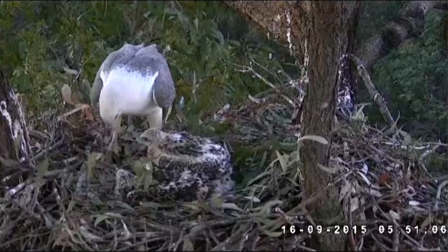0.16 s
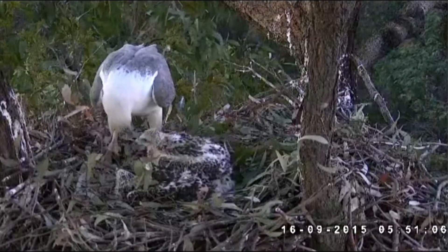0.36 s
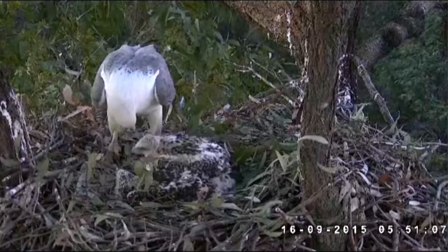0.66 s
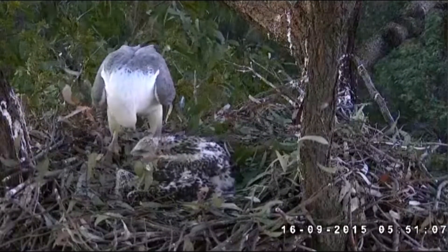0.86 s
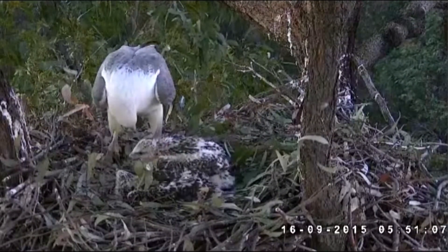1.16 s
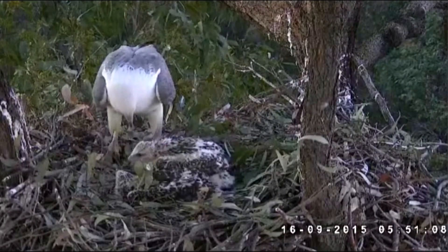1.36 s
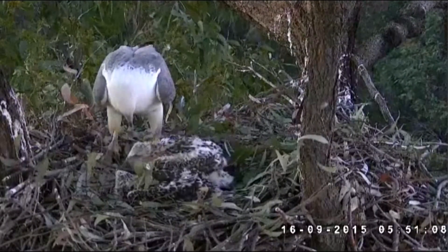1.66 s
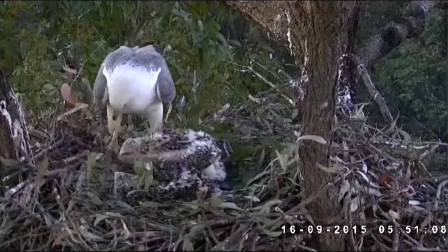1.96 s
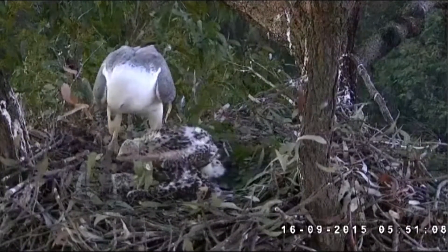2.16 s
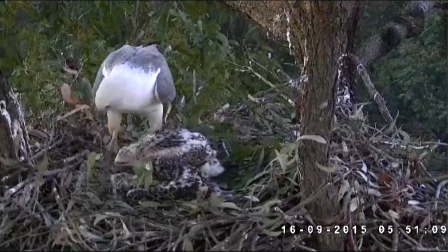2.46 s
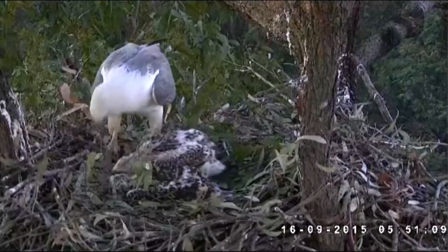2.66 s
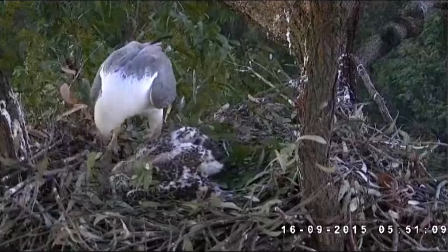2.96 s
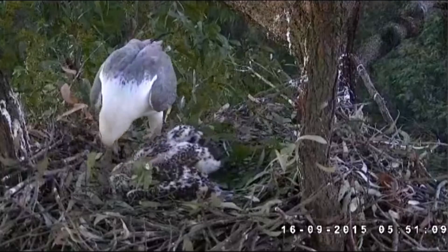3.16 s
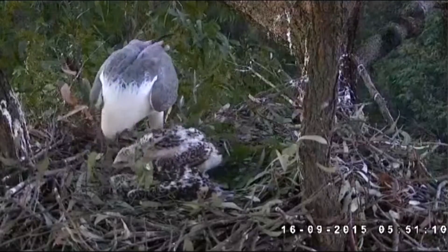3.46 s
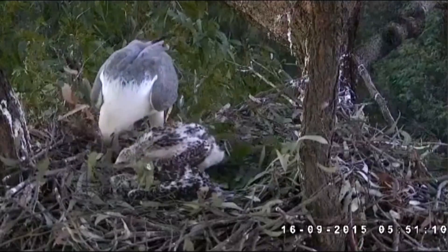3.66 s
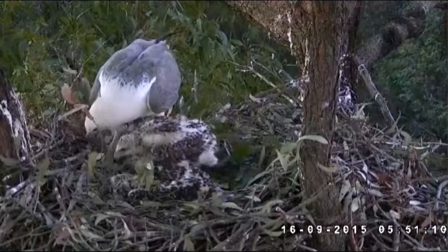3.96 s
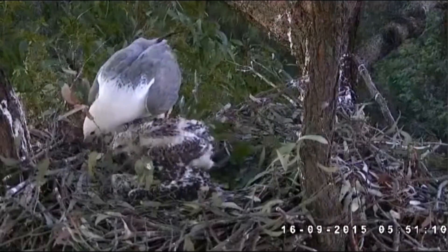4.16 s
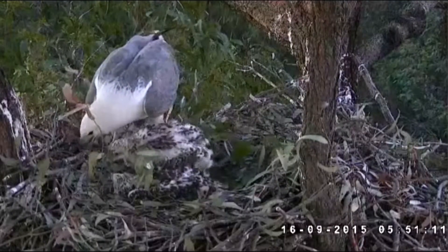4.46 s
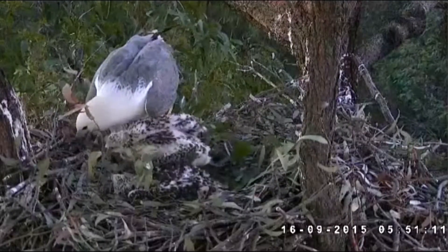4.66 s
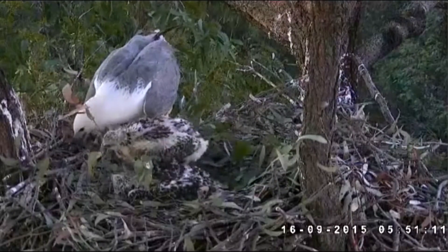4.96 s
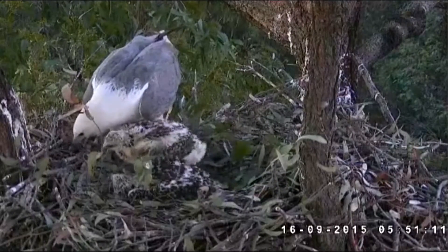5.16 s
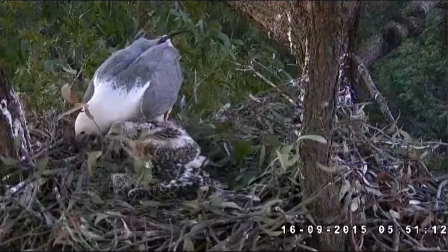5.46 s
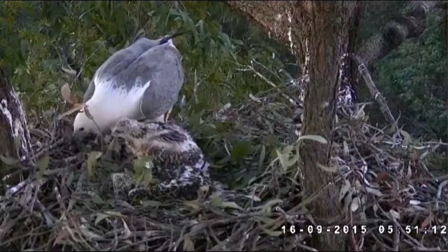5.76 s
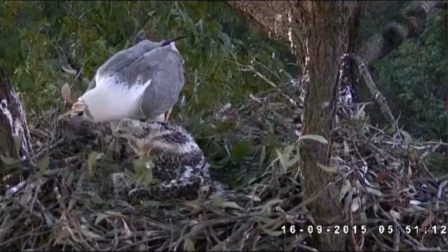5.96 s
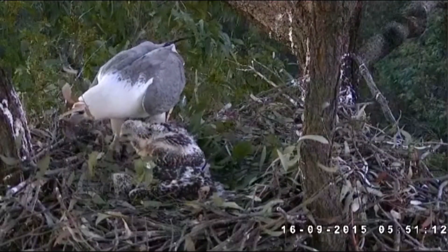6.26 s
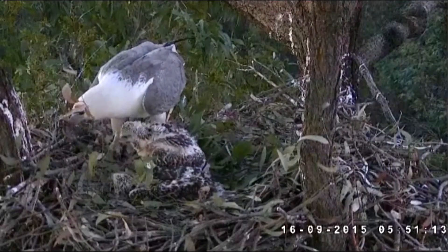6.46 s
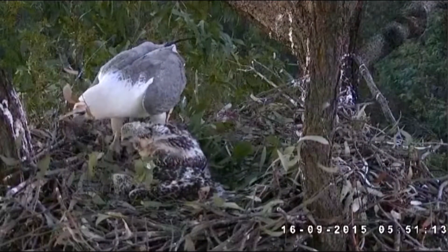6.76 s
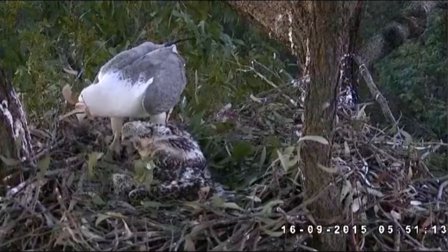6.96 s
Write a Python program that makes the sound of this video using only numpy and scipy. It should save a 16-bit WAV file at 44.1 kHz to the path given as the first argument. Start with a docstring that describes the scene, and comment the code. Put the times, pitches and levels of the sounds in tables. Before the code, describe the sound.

Raspy, high begging calls from an eagle chick echo through a forest over equipment hum, light nest crackles and far-off chirps.

```python
"""Equipment hums steadily in a forest, where the ring of an eagle nestling's call is dying away.
Twigs rustle and crunch as a parent tears at food on the stick nest, and the nestling begs five times.
Each call follows the source-filter principle: slapping membranes in the syrinx excite resonances of
throat and bill, giving a hoarse rasp with a wavering whistle in it that reverberates among the trees.
In the second half small birds chirp far off."""
import sys
import numpy as np
from scipy import signal
from scipy.fft import rfft, irfft
from scipy.io import wavfile

SR = 44100
rng = np.random.default_rng(int(sys.argv[2]) if len(sys.argv) > 2 else 0)


def wav_out(sig):
    """Save sig, one row per channel (or a flat mono array), as 16-bit PCM at SR to the path in sys.argv[1]."""
    wavfile.write(sys.argv[1], SR, np.round(np.clip(np.atleast_2d(sig).T, -1, 1) * 32767).astype(np.int16))


N = 313110
TIME = np.arange(N) / SR
PULSE_HZ = 233.35   # mean cycle rate of the syrinx, two slaps to a cycle


def from_db(db):
    """Amplitude ratio of a relative level: tenfold for every 20 dB."""
    return 10 ** (np.asarray(db) / 20)


def rms_one(x):
    """Normalisation to unit mean power."""
    return x / np.sqrt(np.mean(x ** 2) + 1e-20)


def drift(rate_hz, size):
    """Random modulation: straight lines between Gaussian values drawn rate_hz times a second."""
    knots = rng.standard_normal(size // 8 + 2)
    return np.interp(np.arange(size) * rate_hz / SR, np.arange(len(knots)), knots)


def span(start_s, length_s, attack_s, release_s):
    """Trapezoidal gating: an event's sample indices, the time since its onset and its envelope."""
    at = np.flatnonzero((TIME >= start_s) & (TIME < start_s + length_s))
    t = TIME[at] - start_s
    return at, t, np.clip(np.minimum(t / attack_s, (length_s - t) / release_s), 0, 1)


def colour(x, spectrum):
    """Spectral shaping by (frequency [Hz], gain [dB]) points, with steep skirts outside; rms 1."""
    hz, db = np.transpose(spectrum)
    f = np.maximum(np.fft.rfftfreq(2 * N, 1 / SR), 1)
    skirts = np.minimum(1, np.minimum(f / hz[0], hz[-1] / f)) ** 8
    gain = from_db(np.interp(np.log(f), np.log(hz), db))
    return rms_one(irfft(rfft(x, 2 * N) * skirts * gain)[:N])


def resonance(x, hz, width_hz):
    """Resonance of two cascaded damped oscillators whose centre may move; unit gain at the peak."""
    carrier = np.exp(2j * np.pi * np.cumsum(hz * np.ones(len(x))) / SR)
    pole = np.exp(-np.pi * width_hz / np.sqrt(np.sqrt(2) - 1) / SR)
    baseband = signal.lfilter([(1 - pole) ** 2], [1, -2 * pole, pole ** 2], x / carrier)
    return 2 * np.real(carrier * baseband)


def hum(rush_db=-43, hiss_db=-69.5, waver_db=1.5):
    """Superposition: the equipment's slightly wandering tones lie over a continuous noise spectrum."""
    # tones of the equipment (frequency [Hz], level [dB], wander [Hz])
    tones = [(138.3, -67, 1.05), (349.5, -50.5, 1.626), (381.8, -44.5, 0.715), (767, -77, 0.23),
             (1149, -62, 1.14)]
    # low rush of equipment and forest (frequency [Hz], spectral level [dB])
    rush = [(22, -16.5), (55, -9.5), (165, -0.5), (230, -3.5), (290, 4), (380, -3), (450, -13.5),
            (570, -20.5), (790, -18), (940, -10.5), (1080, -15.5), (1180, -22), (1300, -23), (1750, -33.5)]
    # faint hiss above the rush (frequency [Hz], spectral level [dB])
    hiss = [(1750, -0.5), (2400, 1), (3600, 0), (4800, -9.5), (7500, -7), (8500, -19.5), (9300, -16),
            (11800, -20.5)]
    out = from_db(rush_db) * colour(rng.standard_normal(N), rush)
    out += from_db(hiss_db) * colour(rng.standard_normal(N), hiss)
    for hz, db, wander_hz in tones:
        phase = 2 * np.pi * np.cumsum(hz + wander_hz * drift(6, N)) / SR
        out += np.sqrt(2) * from_db(db + waver_db * drift(5, N)) * np.sin(phase)
    return out


def lingering_ring(level_db=-55, fall_db_per_s=40):
    """Exponential decay of reverberation: the trees still ring from a call just before."""
    bands = sum(resonance(rng.standard_normal(N), hz, width_hz=540) for hz in (2150, 2650, 3050))
    return rms_one(bands) * from_db(level_db - fall_db_per_s * TIME)


def nest(snaps_per_s=1500, rest_db=-81.5, fitful_db=6.0, tick_db=2.0):
    """Shot noise: dry leaves and twigs give tiny snaps, louder as a bird shifts or something breaks."""
    # the birds shift on the nest (time [s], duration [s], level [dB])
    shuffles = [(0.138, 0.077, -73), (0.977, 0.11, -67.5), (1.88, 0.066, -70), (1.145, 0.11, -77),
                (1.26, 0.094, -66), (2.805, 0.12, -69), (3.504, 0.25, -67), (3.775, 0.17, -78),
                (4.093, 0.34, -70.5), (4.414, 0.28, -80.5), (4.674, 0.11, -72), (4.833, 0.52, -75.5),
                (5.347, 0.7, -78), (6.47, 0.22, -67.5), (6.65, 0.39, -70.5)]
    # rustle of dry leaves (frequency [Hz], spectral level [dB])
    leaves = [(1500, 7.5), (3000, -19), (4800, -7), (6500, -2), (7600, -4.5), (8500, -4), (9400, -33),
              (11800, -32.5)]
    # twigs break (time [s], level [dB], Gaussian spread [s])
    crunches = [(1.918, -77, 0.014), (2.127, -72, 0.011), (3.545, -62, 0.006), (3.638, -54, 0.023),
                (4.324, -62, 0.02), (4.515, -60, 0.0017)]
    # timbre of a breaking twig (frequency [Hz], spectral level [dB])
    twig = [(2000, 11.5), (4000, 5), (7000, 5), (9000, 0), (11800, -9)]
    snaps = (rng.random(N) < snaps_per_s / SR) * rng.choice([-1, 1], N)
    stir = np.full(N, from_db(rest_db))
    for start_s, length_s, db in shuffles:
        at, _, envelope = span(start_s, length_s, attack_s=0.018, release_s=0.018)
        stir[at] += from_db(db) * envelope
    stir *= from_db(fitful_db * np.tanh(drift(24, N)) + tick_db * drift(120, N))
    crunch = sum(from_db(db) * np.exp(-.5 * ((TIME - peak_s) / spread_s) ** 2)
                 for peak_s, db, spread_s in crunches)
    splinters = snaps + rng.standard_normal(N) * np.std(snaps)   # a break also hisses
    return stir * colour(snaps, leaves) + crunch * colour(splinters, twig)


def syrinx(size, jitter=.045, shimmer_db=2.4, rebound_db=-5.5, air_db=-6.0, gating=0.7):
    """Pulse excitation: membranes slap unevenly and pass air in puffs; returns (source, air alone)."""
    cycles = np.cumsum(PULSE_HZ * (1 + jitter * drift(300, size) + .035 * drift(25, size))) / SR
    half_cycle = np.floor(2 * cycles)
    rebound = half_cycle % 2   # the weaker slap in mid cycle
    strength = from_db(rebound_db * rebound + shimmer_db * drift(500, size))
    slaps = np.diff(half_cycle, prepend=0) * strength
    puffs = 1 + gating * np.cos(2 * np.pi * 2 * cycles)
    air = rms_one(rng.standard_normal(size) * strength * puffs)
    return rms_one(slaps) + from_db(air_db) * air, air


def modes(x, table, tuning, flutter_db=6.0, waver=0.012, stray=0.0082):
    """Modal superposition: parallel resonances, scaled by tuning, flutter in gain and pitch; rms 1."""
    size = len(x)
    out = np.zeros(size)
    for hz, width_hz, db in table:
        gain = from_db(db + flutter_db * np.tanh(drift(29.2, size)))
        detuning = 1 + waver * drift(27.6, size) + stray * drift(7, size)
        out += gain * resonance(x, hz * tuning * detuning, width_hz)
    return rms_one(out)


def hollow(x, hollow_width_hz=190, hollow_depth=0.62, treble_depth=0.57, shift=0.017, top_hz=9500):
    """Notch filtering: shallow fixed dips make a call hollow, further dips notch the treble unevenly; a low-
    pass cuts the top."""
    # fixed dips that give every call a hollow tone (frequency [Hz])
    hollow_notches = [1310, 1740, 2370]
    # shallow dips in the treble, placed a little differently each time (mean frequency [Hz], bandwidth [Hz])
    treble_notches = [(3720, 200), (4800, 260), (6750, 240), (8050, 300)]
    for hz in hollow_notches:
        notch = signal.iirnotch(hz, hz / hollow_width_hz, SR)
        x = x + hollow_depth * (signal.lfilter(*notch, x) - x)
    for hz, width_hz in treble_notches:
        notch = signal.iirnotch(hz * (1 + shift * rng.standard_normal()), hz / width_hz, SR)
        x = x + treble_depth * (signal.lfilter(*notch, x) - x)
    return signal.sosfilt(signal.butter(16, top_hz, fs=SR, output="sos"), x)


def beg(call, arch_hz=60, waver=0.026, throat_db=-3.5, low_db=-12.0):
    """Source and filter: the syrinx drives throat and bill, growing louder as the bill opens."""
    # resonances below the throat's main peak (nominal frequency [Hz], bandwidth [Hz], gain [dB])
    low_modes = [(985, 130, -0.5), (1170, 120, 2.5), (1560, 150, 0)]
    # resonances of the open gape (nominal frequency [Hz], bandwidth [Hz], gain [dB])
    gape_modes = [(2870, 170, 0), (3120, 160, 0), (3370, 130, -7.5)]
    # treble resonances heard as rasp (nominal frequency [Hz], bandwidth [Hz], gain [dB])
    rasp_modes = [(4020, 190, 0), (4330, 210, -1), (5150, 240, -5.5), (5470, 220, -7)]
    # highest resonances, heard as sizzle (nominal frequency [Hz], bandwidth [Hz], gain [dB])
    sizzle_modes = [(6000, 240, 0), (6450, 220, -0.5), (7150, 220, -1), (7550, 240, 0), (8400, 260, -11),
                    (9200, 440, -13.5)]
    (start_s, length_s, level_db, open_s, throat_hz, bill_hz,
     bill_db, gape_db, rasp_db, sizzle_db, push_db, effort_s, effort_db) = call
    shut_db, shut_gape_db, shut_treble_db = -2.5, -15, -1.5
    push_s, push_treble_share = 0.086, 0.25
    effort_spread_s, effort_bill_share = 0.056, 0.32
    sag_s, sag_share, rise_share = 0.0364, 0.32, 0.045
    at, t, envelope = span(start_s, length_s, attack_s=0.04, release_s=0.079)
    # the voice brightens or dulls at the hardest effort, and again in a closing push
    shut = np.clip(1 - t / open_s, 0, 1)
    bright_db = effort_db * np.exp(-.5 * ((t - effort_s) / effort_spread_s) ** 2)
    closing_db = push_db * np.clip(2 * (1 - (length_s - t) / push_s), 0, 1)
    mouth_db = effort_bill_share * bright_db
    treble_db = bright_db + shut_treble_db * shut + push_treble_share * closing_db
    # the throat resonance arches, the upper ones rise, and all but the low modes sag as the bill closes
    arch = arch_hz * (np.sin(np.pi * t / length_s) - .5)
    sag = 1 - sag_share * np.clip(1 - (length_s - t) / sag_s, 0, 1)
    glide = sag * (1 + rise_share * (t / length_s - .5))
    source, air = syrinx(len(at))
    tremble = sag * (1 + waver * drift(91.9, len(at)))
    throat = rms_one(resonance(source, (throat_hz + arch) * tremble, width_hz=175))
    bill = rms_one(resonance(source, bill_hz * tremble, width_hz=290))
    gape = modes(source, gape_modes, glide)
    voice = from_db(throat_db) * throat + from_db(bill_db + mouth_db) * bill
    voice += from_db(gape_db + mouth_db + shut_gape_db * shut + closing_db) * gape
    voice += from_db(rasp_db + treble_db) * modes(source + air, rasp_modes, glide)   # airier treble
    voice += from_db(sizzle_db + treble_db) * modes(source + air, sizzle_modes, glide)
    voice += from_db(low_db) * modes(source, low_modes, tuning=0.97)
    out = np.zeros(N)
    out[at] = envelope * from_db(level_db + shut_db * shut) * hollow(voice)
    return out


def forest(x, near_db, near_t60_s, far_db, low_t60_s=2.37, high_t60_s=2.16, split_hz=3150):
    """Reverberation by random scattering: quick from near limbs, long from the trees, highs dying first."""
    t = TIME[:3 * SR // 2]
    limbs, trees = rng.standard_normal((2, len(t)))
    near = limbs * from_db(-60 * t / near_t60_s)
    low = signal.sosfilt(signal.butter(5, split_hz, "low", fs=SR, output="sos"), trees)
    high = signal.sosfilt(signal.butter(5, split_hz, "high", fs=SR, output="sos"), trees)
    far = low * from_db(-60 * t / low_t60_s) + high * from_db(-60 * t / high_t60_s)
    echoes = from_db(near_db) * near / np.linalg.norm(near) + from_db(far_db) * far / np.linalg.norm(far)
    return x + signal.fftconvolve(x, echoes)[:N]


def whistle(rise_hz_per_s=145, waver=0.0285, octave_db=-27, ends_db=-1, throb_depth=0.43):
    """Amplitude modulation: the slapping membranes shake a wavering, slowly rising near-sine."""
    # the syrinx locks into a whistle (time [s], duration [s], pitch [Hz], level [dB])
    whistles = [(0.26, 0.36, 2160, -42.5), (1.597, 0.22, 2105, -47), (2.403, 0.078, 2604, -38.5),
                (2.463, 0.2, 2103, -42.5), (3.118, 0.343, 2594, -41.5), (6.215, 0.24, 2620, -41)]
    out = np.zeros(N)
    for start_s, length_s, pitch_hz, db in whistles:
        at, t, envelope = span(start_s, length_s, attack_s=0.011, release_s=0.011)
        hz = pitch_hz + rise_hz_per_s * (t - length_s / 2)
        level_db = db + ends_db * (1 - np.sin(np.pi * t / length_s))
        phase = 2 * np.pi * np.cumsum(hz * (1 + waver * drift(228.3, len(at)))) / SR
        slap_phase = 2 * np.pi * np.cumsum(2 * PULSE_HZ * (1 + 0.162 * drift(200, len(at)))) / SR
        tone = np.sqrt(2) * (np.sin(phase) + from_db(octave_db) * np.sin(2 * phase))
        out[at] += envelope * from_db(level_db) * tone * (1 + throb_depth * np.cos(slap_phase))
    return out


def small_birds(waver=0.026):
    """Frequency sweeps: each chirp is a quavering sine that swells and fades as it glides."""
    # distant chirps (time [s], duration [s], start pitch [Hz], end pitch [Hz], level [dB])
    chirps = [(4.633, 0.035, 2920, 3460, -62), (4.81, 0.045, 3220, 3430, -62),
              (4.906, 0.03, 3050, 3430, -69), (4.991, 0.044, 3800, 3370, -64),
              (5.022, 0.11, 3010, 2340, -66), (5.79, 0.054, 3740, 3290, -63.5),
              (5.82, 0.085, 3190, 4280, -60.5), (6.746, 0.047, 4300, 5520, -65),
              (6.86, 0.044, 1615, 2330, -51), (6.993, 0.059, 2010, 2470, -56.5)]
    out = np.zeros(N)
    for start_s, length_s, start_hz, end_hz, db in chirps:
        at = np.flatnonzero((TIME >= start_s) & (TIME < start_s + length_s))
        hz = np.linspace(start_hz, end_hz, len(at)) * (1 + waver * drift(450, len(at)))
        swell = np.sqrt(2 * np.hanning(len(at)))
        out[at] += from_db(db) * swell * np.sin(2 * np.pi * np.cumsum(hz) / SR)
    return out


def far_flock(centre_s=5.36, spread_s=0.35, level_db=-72, pitch_hz=2800, swing=.2, flicker_db=4):
    """Random frequency modulation: one flickering tone gives the brief, faint chatter of a flock."""
    phase = 2 * np.pi * np.cumsum(pitch_hz * (1 + swing * drift(70, N))) / SR
    swell = np.exp(-.5 * ((TIME - centre_s) / spread_s) ** 2)
    chatter = rms_one(from_db(flicker_db * drift(30, N)) * np.sin(phase))
    return swell * from_db(level_db) * chatter


def scene():
    """Linear superposition: reverberant bird voices add to the hum and the stirring nest."""
    # begging calls (time [s], duration [s], level [dB], bill opening time [s], throat resonance [Hz],
    # bill resonance [Hz], bill gain [dB], gape gain [dB], rasp gain [dB], sizzle gain [dB],
    # closing push [dB], time to the hardest effort [s], brightening there [dB])
    calls = [(0.177, 0.53, -37, 0.14, 2217, 2645, -5, -7, -17.5, -26, 1, 0.21, 2.5),
             (1.39, 0.53, -39, 0.15, 2190, 2600, -1.5, -7.5, -19, -26, -0.5, 0.22, 2.5),
             (2.255, 0.5, -39, 0.12, 2166, 2613, -1.5, -3.5, -13.5, -21.5, -10, 0.036, 4.5),
             (3.06, 0.482, -38.3, 0.44, 2164, 2470, 0, -1.5, -15.5, -24, 2.5, 0.078, -1),
             (6.021, 0.54, -39, 0.27, 2233, 2507, -0.5, -8.5, -16, -26, 8, 0.31, 0.5)]
    background = hum() + lingering_ring() + nest()
    rasps = sum(forest(beg(call), near_db=-8.5, near_t60_s=0.48, far_db=-11.5) for call in calls)
    whistles = forest(whistle(), near_db=-10.5, near_t60_s=0.13, far_db=-16)
    far_birds = forest(small_birds() + far_flock(), near_db=1, near_t60_s=0.16, far_db=-5)
    sound = background + rasps + whistles + from_db(-4.5) * far_birds
    return 2 * sound * from_db([[-47], [0]])   # heard almost wholly in the right channel


def record(dry, hiss_db=-79, cutoff_hz=11800):
    """Noise floor and band limit: each channel gains a trace of hiss, then the top is cut steeply."""
    hiss = from_db(hiss_db) * rng.standard_normal((2, N))
    return signal.sosfilt(signal.ellip(12, .1, 90, cutoff_hz, fs=SR, output="sos"), dry + hiss)


dry = scene()
out = record(dry)
wav_out(out)
```